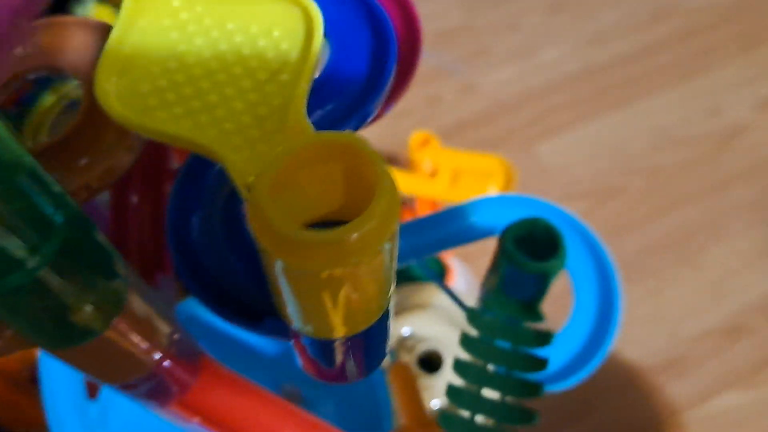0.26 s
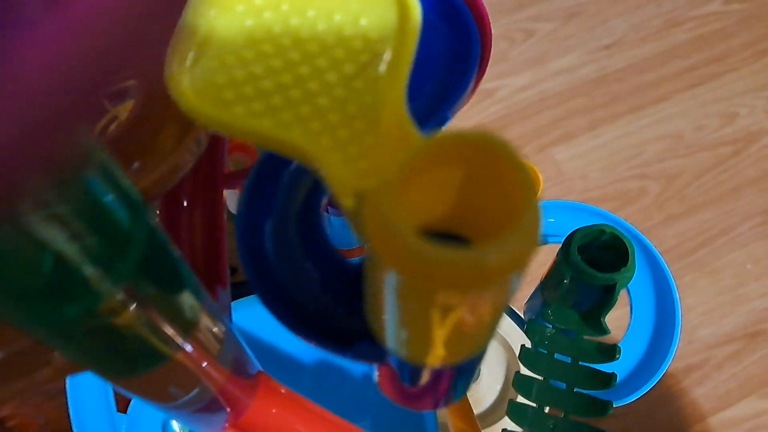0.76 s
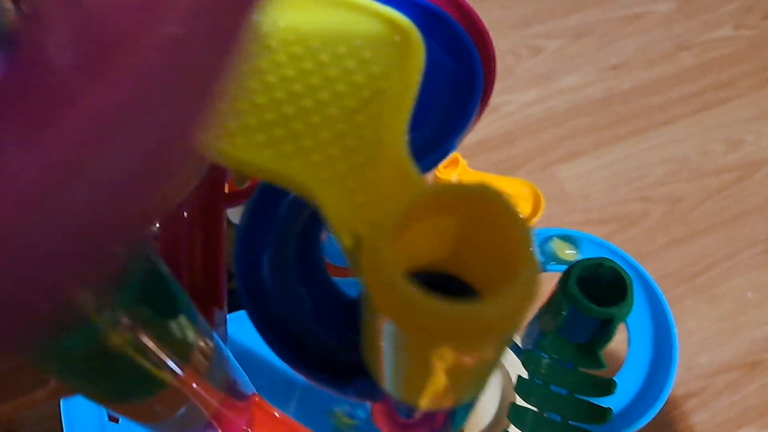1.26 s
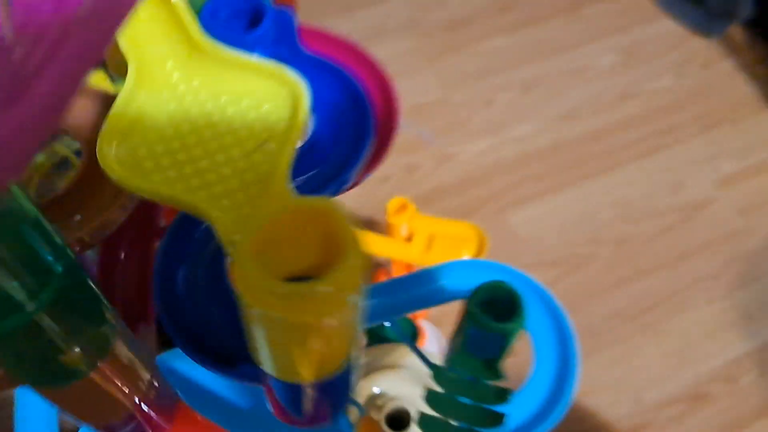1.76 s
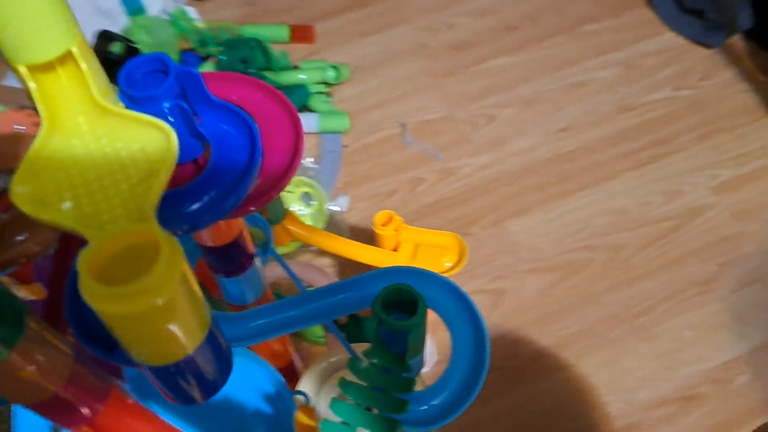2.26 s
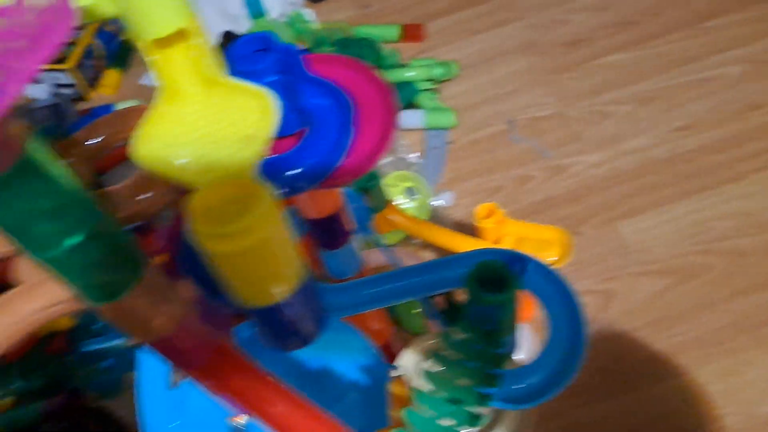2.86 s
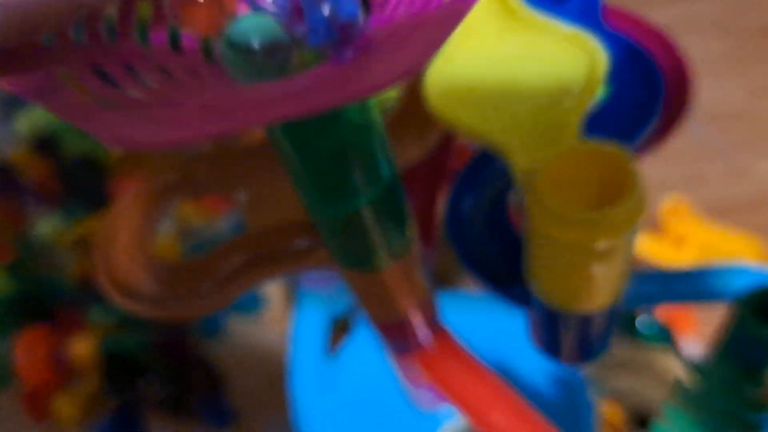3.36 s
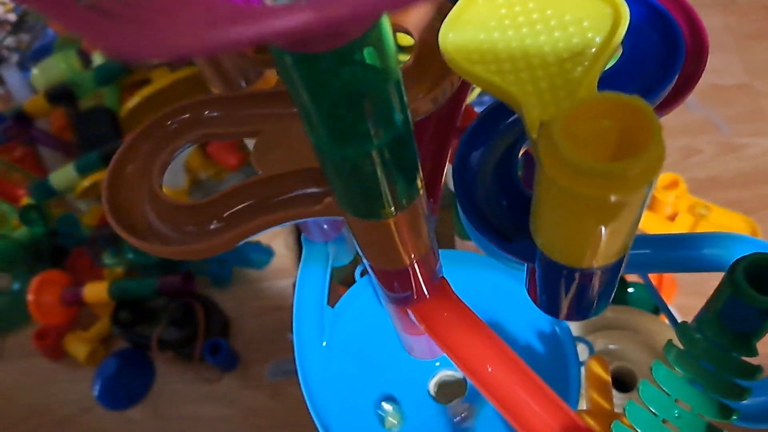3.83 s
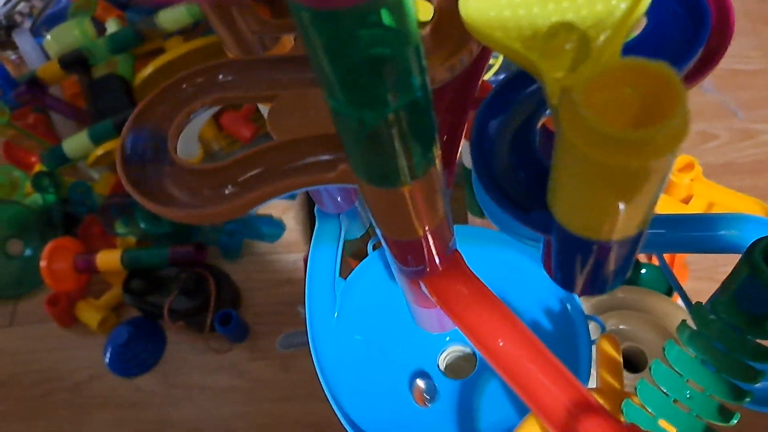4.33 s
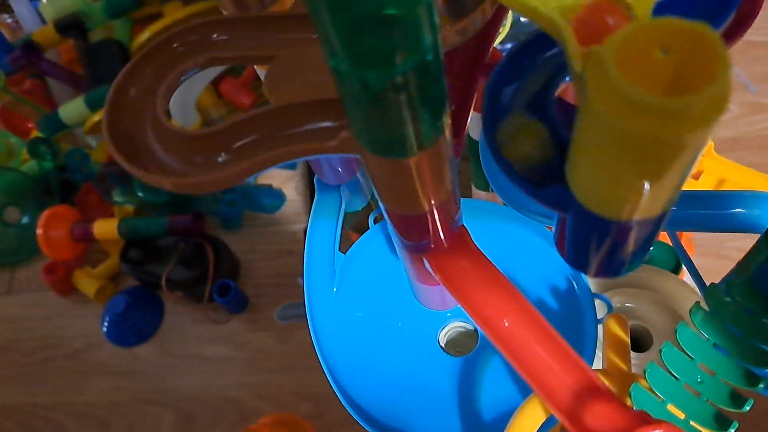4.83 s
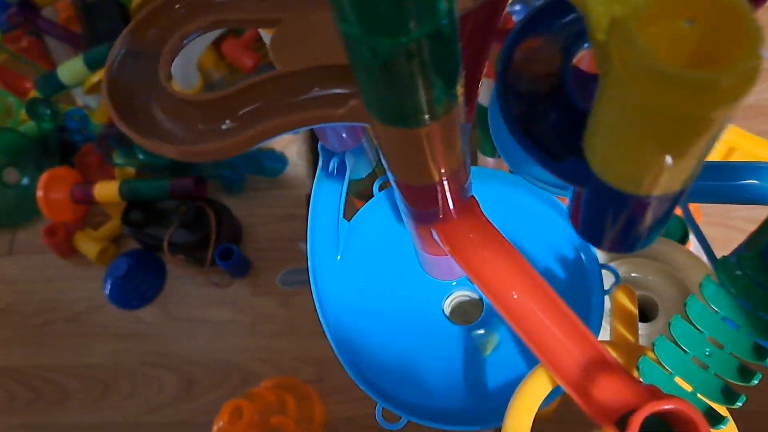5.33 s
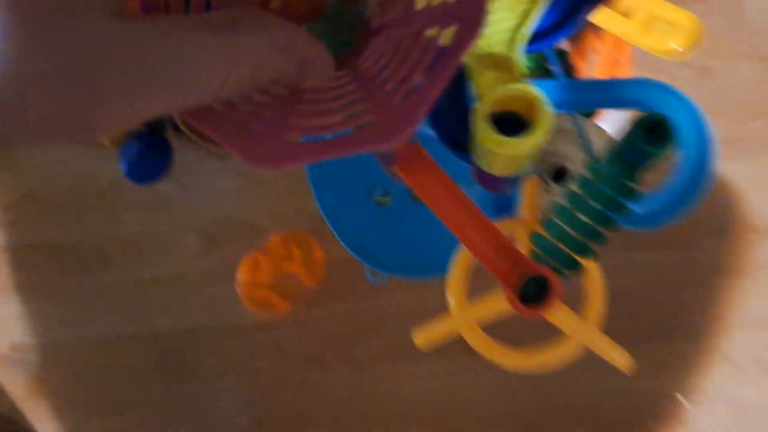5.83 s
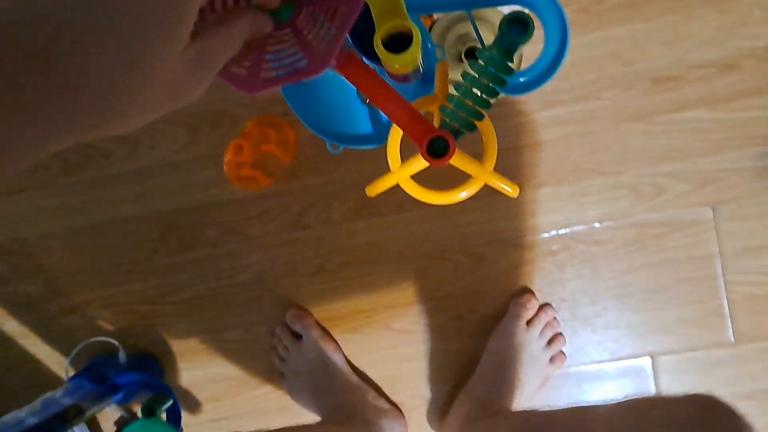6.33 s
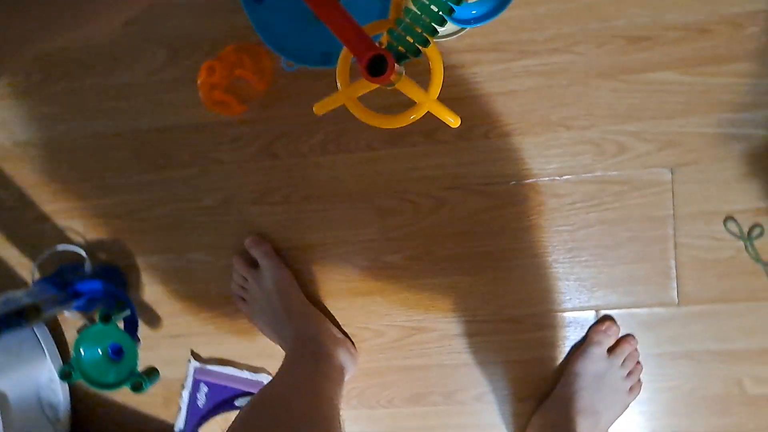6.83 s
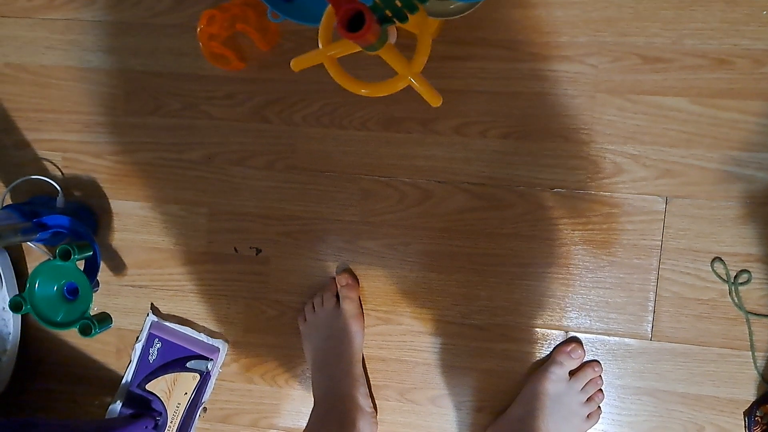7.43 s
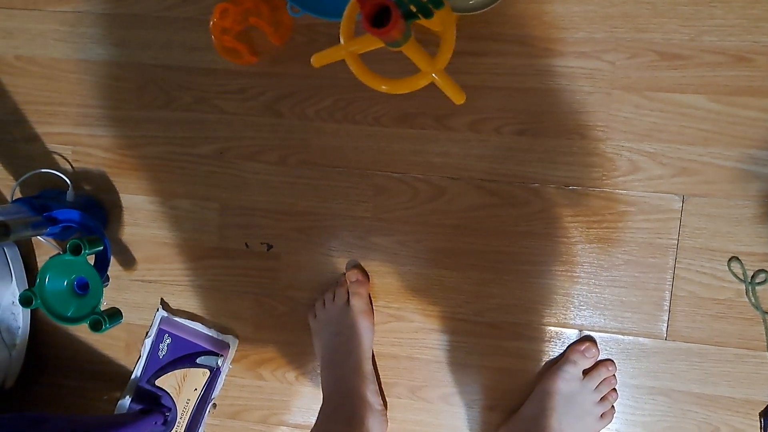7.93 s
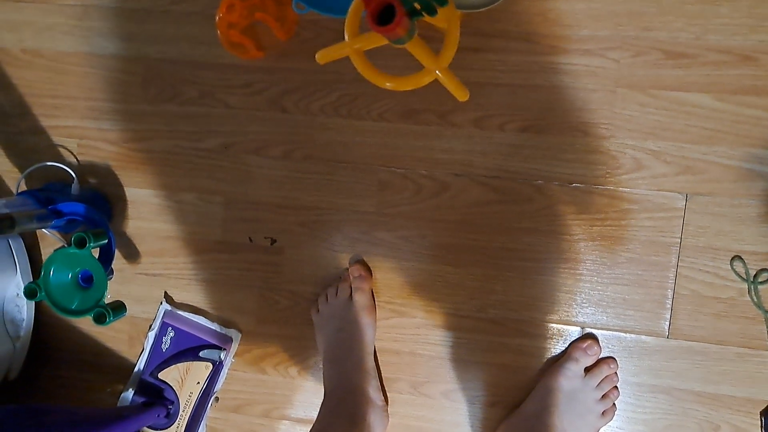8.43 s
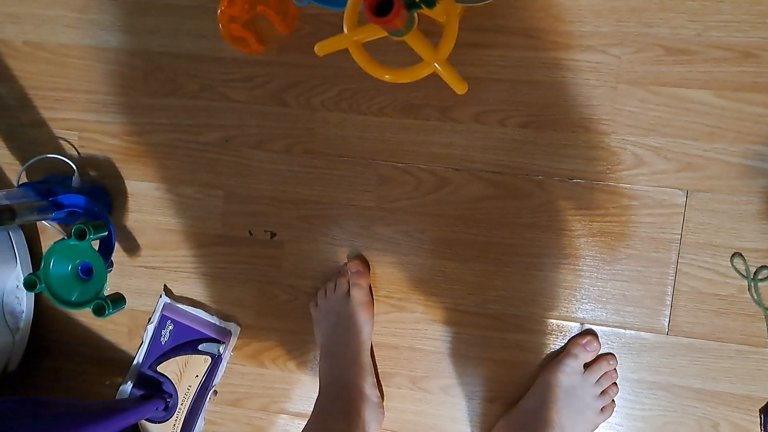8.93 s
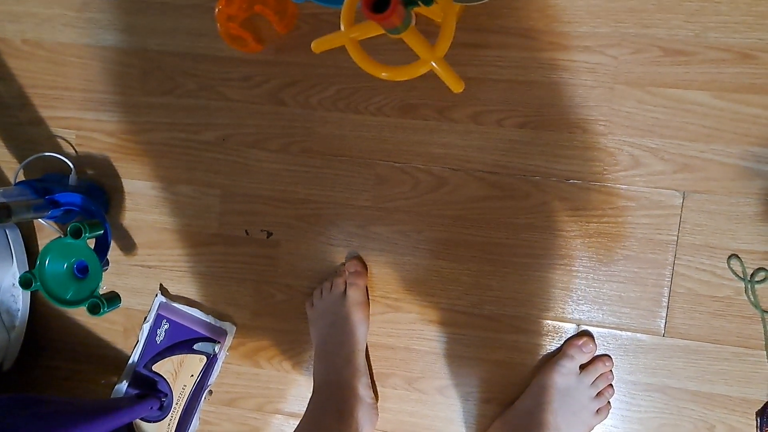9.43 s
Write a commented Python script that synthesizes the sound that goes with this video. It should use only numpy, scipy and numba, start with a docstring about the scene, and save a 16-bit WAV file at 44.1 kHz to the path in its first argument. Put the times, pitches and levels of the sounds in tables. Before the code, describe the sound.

A dense, irregular rattle of small glass marbles tumbling through hollow plastic tracks, with sharp clicks, glassy ticks and a few dull thuds, indoors.

```python
"""A small room: glass marbles tumble down a plastic marble run close to a hand-held two-port microphone.
Knocks, ribs, glass ticks and thuds ring dying modes of the track pieces, with a chatter after each knock.
Rolling is gusty noise through four tube resonances, and plunges are short sine rings of the long tube.
Farther marbles clatter, the walls answer with short noise tails and the holding hand now and then rumbles."""
import sys
import numpy as np
from scipy import signal
from scipy.fft import rfft, irfft, next_fast_len
from scipy.io import wavfile
from scipy.ndimage import map_coordinates
from numba import njit

SR = 44100
rng = np.random.default_rng(int(sys.argv[2]) if len(sys.argv) > 2 else 0)


def materialize(psi):
    """Save the field psi as 16-bit PCM at rate SR to the path in sys.argv[1].

    A 1-D psi becomes a single channel; in a 2-D psi each row is a channel.
    """
    bounded = np.clip(np.atleast_2d(psi).T, -1, 1)
    quanta = np.round(bounded * 32767).astype(np.int16)
    wavfile.write(sys.argv[1], SR, quanta)


def gain_from_db(level_db):
    """Turn a decibel level (scalar or array-like) into a linear amplitude factor."""
    decades = np.asarray(level_db, float) / 20
    return 10 ** decades


N = 426888  # samples
TOP_HZ = 16000  # ceiling of the modes and of the microphone


def unit(x):
    """Scales to rms 1."""
    return x / np.sqrt(np.mean(x ** 2) + 1e-20)


def along(points, hz):
    """Reads (f/Hz, value) points on a log frequency axis."""
    f, v = np.transpose(points)
    return np.interp(np.log(hz + 1), np.log(f + 1), v)


def curve(rows, axis=1):
    """Draws one level/dB column as a value per sample, silent outside its rows."""
    rows = np.asarray(rows)
    return np.interp(np.arange(N) / SR, rows[:, 0], rows[:, axis], -120, -120)


def wobble(rate):
    """Draws a smooth random curve with rate knots a second."""
    knots = rng.standard_normal(int(N * rate / SR) + 4)
    return map_coordinates(knots, [np.arange(N) * rate / SR])


def filtered(x, response):
    """Shapes x by a response of frequency."""
    m = next_fast_len(N + SR // 4)
    return irfft(rfft(x, m) * response(np.fft.rfftfreq(m, 1 / SR)), m)[..., :N]


# Likeness of the sound at the two ports: f/Hz, correlation [-1 to 1]
PORT_LIKENESS = [(60, 0.44), (240, 0.96), (950, 0.76), (3770, 0.13), (15000, -0.23)]


def rush(gain, alike=PORT_LIKENESS):
    """Stereo noise of rms 1: gain sets its spectrum, the mid/side balance sets how alike the ports are."""
    def mid_side(hz):
        turn = np.arccos(np.clip(along(alike, hz), -1, 1)) / 2
        return gain(hz) * [np.cos(turn), np.sin(turn)]
    mid, side = filtered(rng.standard_normal((2, N)), mid_side)
    return unit(np.array([mid + side, mid - side]))


def follow(hits, t60):
    """The strength of the blows at the left port, dying away over t60 seconds."""
    fading = gain_from_db(-60 * np.arange(SR // 4) / SR / t60)
    power = signal.oaconvolve(hits[0] ** 2, fading ** 2)[:N] / np.sum(fading ** 2)
    return np.sqrt(np.abs(power))


@njit
def add(out, start, step, rise, size):
    """Adds dying modes; step holds pitch and decay per sample, size the complex strength at each port."""
    for m in range(len(start)):
        z, gap = 1 + 0j, 1.
        end = min(out.shape[1], start[m] + int(-7 / np.log(abs(step[m]))))
        for i in range(start[m], end):
            out[0, i] += (1 - gap) * (size[0, m] * z).imag
            out[1, i] += (1 - gap) * (size[1, m] * z).imag
            z *= step[m]
            gap *= rise


# Modes of a track piece: f/Hz, level/dB
PLASTIC_MODES = [(150, -22), (250, -10), (350, -15.5), (460, 0.5), (630, 5.5), (780, -5.5), (1150, -7),
                 (1450, 1), (1780, 7.5), (2200, 6.5), (2500, 7.5), (2850, 5.5), (3150, 5), (3550, 9.5),
                 (4100, 10), (4650, 15.5), (5150, 16.5), (5700, 10.5), (6700, 12), (7800, 15), (9000, 12),
                 (10300, 16), (11700, 23), (13000, 18.5), (14500, 13), (15600, 11)]
# Tone control points, the centres of body, main ring, wall and tick: f/Hz
COLOUR_HZ = [700, 2900, 4900, 11000]


def ring(s, db, colour_db, detune, scatter_db, t60, attack=.0004, spot_hz=None):
    """Every blow lands on another piece: the modes come shifted, at new strengths, in threes.
    t60 [s] is typical at 3 kHz; attack [s] is the time constant of the onset."""
    hz, level = np.repeat(PLASTIC_MODES, 3, axis=0).T
    chance = rng.standard_normal((len(s), len(hz), 5))
    tint = np.array([along(list(zip(COLOUR_HZ, c)), hz) for c in colour_db])
    hz = np.minimum(hz * np.exp(detune * chance[..., 0]), TOP_HZ)
    if spot_hz is not None:  # modes near the pitch of the struck spot take most of the blow
        tint = tint + 9 * np.exp(-(np.log(hz / spot_hz[:, None]) / .11) ** 2)
    # plastic damps high modes faster
    t60 = t60 * (hz / 3000) ** -.9 * np.exp(.25 * chance[..., 1])
    step = np.exp((2j * np.pi * hz - np.log(1000) / t60) / SR)
    # neighbouring modes start in step, which makes the attack sharp
    sign = np.repeat(np.sign(chance[:, ::3, 3]), 3, axis=1)
    size = gain_from_db(level + tint + scatter_db * chance[..., 2]) * sign
    # the blow's energy is shared out among the modes
    size = size * (gain_from_db(db) / np.linalg.norm(size, axis=1))[:, None]
    # high modes radiate in lobes, so the two ports hear them with unrelated phase
    apart = np.sqrt(-2 * np.log(np.clip(along(PORT_LIKENESS, hz), .01, 1)))
    ports = np.array([size.ravel() + 0j, (size * np.exp(1j * apart * chance[..., 4])).ravel()])
    # modes too faint to matter are skipped
    heard = (np.abs(size) > gain_from_db(db - 33)[:, None]).ravel()
    start = np.repeat(np.round(s * SR).astype(np.int64), hz.shape[1])
    out = np.zeros((2, N))
    add(out, start[heard], step.ravel()[heard], np.exp(-1 / (attack * SR)), ports[:, heard])
    return out


# Marble on plastic: t/s, level/dB of the blow, f/Hz of the struck spot
KNOCKS = [(0.0124, -5, 3480), (0.0618, -4, 5250), (0.0897, -9, 5260), (0.3297, -19, 3100),
          (0.3956, -6, 3070), (0.4359, -8, 3510), (0.4816, -10, 3070), (0.4958, -12, 3070),
          (0.5235, -14, 3120), (0.7459, -5, 3800), (0.792, -5, 3480), (0.8233, -5, 3130),
          (0.8487, -10, 4410), (1.2552, -5, 3310), (1.2651, -7, 3310), (1.2722, -9, 4830),
          (1.298, -10, 2640), (1.3177, -6, 3110), (1.3643, -7, 3170), (1.3906, -8, 5090),
          (1.6417, -18, 3000), (1.7138, -7, 3070), (1.7314, -9, 3390), (1.7687, -9, 3490),
          (1.7965, -15, 3060), (1.814, -6, 3050), (2.0946, -16, 3850), (2.1487, -4, 3470),
          (2.1628, -6, 3480), (2.186, -9, 2940), (2.2299, -11, 2950), (2.2532, -11, 2960),
          (2.3403, -8, 4900), (2.434, -16, 3900), (2.446, -7, 3840), (2.4868, -9, 4110),
          (2.5311, -17, 3940), (2.5911, -6, 2990), (2.6988, -6, 4170), (2.7465, -11, 3230),
          (2.7695, -13, 3210), (2.829, -6, 3260), (2.8411, -8, 3240), (2.8889, -7, 3230),
          (2.9014, -6, 3960), (2.911, -7, 5100), (2.9228, -8, 4260), (2.9411, -6, 2540), (2.9676, -6, 3950),
          (3.0788, -14, 3260), (3.1468, -6, 4410), (3.164, -10, 2420), (3.1912, -7, 3320),
          (3.2292, -7, 3120), (3.2475, -13, 2480), (3.2583, -13, 2660), (3.2896, -8, 2630),
          (3.4027, -11, 3290), (3.4366, -5, 3560), (3.4659, -11, 2820), (3.686, -10, 3270),
          (3.7203, -9, 2490), (3.7343, -8, 3260), (3.7437, -6, 3280), (3.752, -8, 2890), (3.7882, -9, 3000),
          (3.8106, -6, 2930), (3.8288, -5, 2850), (3.838, -6, 2860), (3.8477, -8, 2900),
          (3.8722, -12, 2940), (3.9056, -6, 2950), (3.9217, -11, 2930), (3.9748, -7, 3840),
          (4.0389, -10, 3390), (4.0555, -11, 3430), (4.0741, -7, 2860), (4.1153, -8, 3010),
          (4.1472, -12, 5080), (4.1714, -13, 2870), (4.2322, -14, 3200), (4.3148, -9, 5170),
          (4.3487, -12, 2950), (4.3734, -6, 4750), (4.4203, -10, 3700), (4.5381, -9, 4120),
          (4.5545, -8, 3000), (4.591, -6, 2870), (4.6129, -10, 2820), (4.6805, -11, 3230),
          (4.7223, -7, 2690), (4.7652, -10, 3240), (4.7769, -6, 5160), (4.8069, -5, 5220),
          (4.8216, -10, 3250), (4.916, -6, 4810), (4.9525, -3, 3330), (4.9636, -9, 3320),
          (4.971, -10, 2900), (4.9928, -9, 2990), (5.022, -10, 2920), (5.0539, -6, 2950),
          (5.1088, -6, 4710), (5.1376, -12, 4660), (5.1668, -10, 3070), (5.223, -6, 4630),
          (5.2476, -9, 4690), (5.2875, -12, 5050), (5.3019, -9, 4630), (5.3228, -9, 3040),
          (5.3414, -8, 4210), (5.3526, -2, 4670), (5.364, -7, 4760), (5.4269, -12, 4680),
          (5.4458, -9, 2950), (5.4549, -5, 4660), (5.487, -12, 4470), (5.511, -8, 3120), (5.6288, -4, 4670),
          (5.6471, -11, 2510), (5.7012, -15, 2580), (5.85, -15, 3000), (5.8617, -10, 3820),
          (5.891, -13, 2790), (6.1452, -15, 4150), (6.1925, -14, 2700), (6.2093, -9, 3090),
          (6.2909, -6, 2940), (6.3313, -11, 4820), (6.3794, -6, 4620), (6.393, -10, 2760),
          (6.409, -11, 4680), (6.4511, -12, 2900), (6.5027, -7, 3050), (6.5991, -9, 3140),
          (6.6548, -18, 3050), (6.8159, -18, 3070), (6.8559, -8, 2850), (6.8657, -9, 2840),
          (6.8802, -13, 2850), (6.9667, -7, 3380), (7.0504, -12, 2860), (7.0743, -10, 2870),
          (7.1097, -5, 3040), (7.1798, -8, 2670), (7.3799, -11, 4340), (7.4132, -9, 2530),
          (7.4367, -10, 2500), (7.4687, -11, 2440), (7.5043, -11, 3570), (7.5662, -6, 5100),
          (7.6082, -9, 3480), (7.6206, -7, 3140), (7.7376, -16, 2490), (7.8679, -8, 3740),
          (7.912, -5, 3030), (7.9509, -10, 3050), (8.0038, -8, 3450), (8.0644, -12, 2330),
          (8.287, -14, 2140), (8.3492, -6, 4540), (8.3619, -9, 2490), (8.3922, -13, 2510),
          (8.4133, -7, 2670), (8.447, -8, 4650), (8.48, -5, 4620), (8.4984, -11, 4790), (8.5213, -5, 3550),
          (8.566, -9, 4680), (8.5744, -9, 2470), (8.5917, -7, 4650), (8.6055, -11, 2500),
          (8.6175, -13, 2490), (8.6713, -12, 2420), (8.7158, -11, 2620), (8.7388, -10, 3100),
          (8.764, -7, 2150), (8.7896, -8, 2200), (8.8268, -17, 3020), (8.9108, -11, 2390),
          (8.9591, -8, 2530), (8.9829, -11, 2510), (9.1171, -9, 5180), (9.1451, -9, 5190),
          (9.2385, -6, 2380), (9.2843, -13, 2500), (9.4472, -12, 2720), (9.4754, -5, 3000),
          (9.5183, -13, 4360), (9.6053, -16, 2750), (9.6599, -13, 2350)]


def knocks():
    """Each clear knock, then the marble chattering against the wall in a few mostly fainter contacts."""
    rebounds = 3
    first_db, fade_db_per_s = -7, 260  # chatter under the knock, then its fade with time
    s, db, spot_hz = np.transpose(KNOCKS)
    colour = [-15.5, 3, 0, -13] + rng.normal(0, 2.2, (len(s), len(COLOUR_HZ)))
    blow = ring(s, db, colour, detune=.059, scatter_db=2, t60=.035, attack=.0004, spot_hz=spot_hz)
    flights = rng.uniform(.002, .011, (len(s), rebounds))  # seconds between contacts
    late = np.cumsum(flights, axis=1)
    after_db = (db + first_db)[:, None] - fade_db_per_s * late + rng.normal(0, 2.5, late.shape)
    chatter = ring((s[:, None] + late).ravel(), after_db.ravel(), np.repeat(colour, rebounds, axis=0),
                   detune=.057, scatter_db=4.5, t60=.023, attack=.00025,
                   spot_hz=np.repeat(spot_hz, rebounds))
    return blow + chatter


# A marble runs over a ribbed piece: t/s of the first rib, t/s between ribs, level/dB, f/Hz of the spot
RIBS = [(.549, .0157, -18.5, 3500), (1.877, .0187, -19, 3200)]
# Taps in each run: [count]
RIB_COUNTS = (12, 9)


def ribs():
    """Nearly even runs of light taps: each rib strikes the modes around its run's pitch."""
    first, gap, db, spot_hz = np.repeat(RIBS, RIB_COUNTS, axis=0).T
    slip, size = rng.standard_normal((len(gap), 2)).T
    rib = np.concatenate([np.arange(count) for count in RIB_COUNTS])
    s = first + gap * (rib + .05 * slip)
    return ring(s, db + 1.5 * size, [[-20, 3, -3, -8]] * len(gap),
                detune=.03, scatter_db=2.5, t60=.03, attack=.0006, spot_hz=spot_hz)


# Marble on marble: t/s, level/dB
TICKS = [(0.3955, -16), (1.2979, -17), (1.3174, -15), (1.7794, -14), (2.1625, -13), (2.3426, -7),
         (2.6988, -15), (2.7651, -7), (2.8888, -16), (2.9228, -14), (2.9432, -10), (3.041, -11),
         (3.4366, -15), (3.4491, -12), (3.4654, -14), (3.4895, -9), (3.5002, -13), (3.6905, -9),
         (3.7014, -7), (3.7144, -12), (3.7274, -11), (3.7653, -11), (3.7808, -11), (3.8077, -6),
         (3.8189, -16), (3.8324, -11), (3.8478, -11), (3.8716, -11), (4.2308, -14), (4.7606, -16),
         (4.9606, -9), (4.9714, -12), (5.0439, -16), (5.8087, -9), (7.0818, -17), (7.1526, -15),
         (6.393, -16), (7.064, -18), (7.4764, -12), (7.5343, -11), (7.6191, -13), (8.5739, -14),
         (8.902, -15)]


def ticks():
    """Glass meets glass in so short a contact that the highest modes under it lead."""
    s, db = np.transpose(TICKS)
    return ring(s, db, [[-45, -17, -11, 0]] * len(s), detune=.09, scatter_db=2.5, t60=.031, attack=.00015)


# Heavier drops into a hollow piece: t/s, level/dB
THUDS = [(.542, -19), (.68, -21), (.869, -22), (1.061, -2), (1.081, -11), (1.086, -4), (1.132, -12),
         (1.157, -18), (1.178, -13), (1.217, -15), (1.259, -15), (1.506, -15), (2.341, -20), (2.487, -19),
         (2.919, -19), (3.181, -21), (4.375, -21)]


def thuds():
    """A heavier drop shakes the whole piece: low modes lead and hang on, the walls stay dull."""
    s, db = np.transpose(THUDS)
    boom_hz = np.full(len(s), 165)  # modes near this pitch are favoured
    blow = ring(s, db, [[-1, 0, -12, -26]] * len(s),
                detune=.1, scatter_db=2.5, t60=.011, spot_hz=boom_hz)
    boom = ring(s, db - 14, [[0, -8, -30, -40]] * len(s),
                detune=.15, scatter_db=3, t60=.025, attack=.003, spot_hz=boom_hz)
    return blow + boom


# Air resonances of the tubes, the long one first; the last two lists are the short tube at two pitches: f/Hz,
# width/Hz, level/dB
TUBES = [
    [(473, 55, 0)],
    [(788, 150, 0)],
    [(1800, 90, 0)],
    [(1700, 100, 0)],
]
# A marble drops into the long tube: t/s, peak level/dB
PLUNGES = [(5.853, -39), (5.891, -33), (5.975, -38), (9.475, -30)]


def plunges():
    """The air in the long tube rings briefly: a decaying sine from each drop."""
    t60 = .11  # seconds
    tube_hz = TUBES[0][0][0]
    out = np.zeros(N)
    for s, db in PLUNGES:
        since = (np.arange(N) / SR - s).clip(0)
        out += gain_from_db(db - 60 * since / t60) * np.sin(2 * np.pi * tube_hz * since)
    return out


# The crowded top modes, spectrum shape: f/Hz, level/dB
SIZZLE = [(5000, -24), (6500, -2), (9000, -6), (11700, 0), (16000, -11)]


def sizzle(hits):
    """The top modes lie too close to tell apart: each contact sets off a short bright noise burst."""
    under_db, t60 = -17.5, .032  # level against the contacts, decay in seconds
    return gain_from_db(under_db) * follow(hits, t60) * rush(lambda hz: gain_from_db(along(SIZZLE, hz)))


# Spectrum shape of the rolling rush: f/Hz, level/dB
ROLL = [(59, -58), (100, -19), (300, -11), (634, -11), (1000, -4), (1280, -1.5), (1800, -3), (2990, 6),
        (5200, -8), (6300, -20), (8640, -27.5), (11900, -24.5), (16000, -36)]
# Hum of the tubes before their gusts: t/s, then level/dB of each list in the order of TUBES
HUM = [(0.0, -58, -46, -47, -45), (0.78, -59, -46, -46, -46), (4.47, -60, -53, -48, -45),
       (5.36, -60, -50, -46, -42), (6.04, -56, -51, -44, -46), (6.55, -59, -51, -39, -45),
       (7.68, -60, -48, -38, -46), (9.68, -56, -49, -40, -47)]
# Activity of marbles further down the run: t/s, level/dB
TRAFFIC = [(0.0, -34), (0.91, -35), (2.2, -33), (3.1, -29), (3.69, -32), (3.88, -28), (4.34, -30),
           (5.2, -27), (5.74, -33), (6.2, -33), (6.36, -29), (8.0, -26), (8.3, -30), (8.55, -26),
           (9.33, -30), (9.68, -25.5)]


def rolling(hits):
    """Glass on plastic rushes unevenly, hardest just after blows, and sets the air in three tubes humming; the
    short tube's hum moves between pitches near 1800 and 1700 Hz."""
    rush_db = -5.5  # over the traffic level
    skid = follow(hits, t60=.27)

    def peaks(modes):
        return lambda hz: sum(gain_from_db(db) / (1 + (2 * (hz - c) / width) ** 2) for c, width, db in modes)

    hums = 0
    for k, tube in enumerate(TUBES):
        gusts = gain_from_db(2.5 * wobble(25) + 1.7 * wobble(5)) * (1 + 11 * skid)
        hums = hums + gain_from_db(curve(HUM, axis=k + 1)) * gusts * rush(peaks(tube))
    strength = gain_from_db(curve(TRAFFIC) + rush_db) + .18 * skid
    unevenness = gain_from_db(2.85 * wobble(40) + 1.1 * wobble(9.6))
    return hums + strength * unevenness * rush(lambda hz: gain_from_db(along(ROLL, hz)))


def clatter():
    """Many small contacts of marbles further down the run, short rings that follow the traffic level."""
    count = 1400
    over_db, spread_db = -1.5, 4.2  # least level over the traffic, scale of the random rise above it
    s, size, *tint = rng.random((count, 5)).T
    s = s * N / SR
    db = curve(TRAFFIC)[(s * SR).astype(int)] + over_db - spread_db * np.log(np.maximum(size, .05))
    tint = np.transpose([tint[0], .5 + 0 * s, tint[1], tint[2]])  # the main ring is left as it is
    colour = np.array([-23, -2.5, -1.5, -15]) + 8 * (tint - .5)
    return ring(s, db, colour, detune=.07, scatter_db=4, t60=.018, attack=.0002)


# Fingers shift, before wobble and port balance: t/s of the peak, level/dB, t/s of a 20 dB fall
HANDLING = [(3.71, -50, .06), (5.74, -60, .08), (5.93, -45, .12), (6.11, -55, .06), (7.59, -49, .06),
            (8.5, -46, .5)]
# Spectrum shape of the rumble: f/Hz, level/dB
RUMBLE = [(20, -16.5), (55, 10), (110, -6), (200, -19)]


def handling():
    """Fingers shift on the case: low lumps of noise, strongest at the right port, over a faint rumble."""
    still_db, rise_s = -81, .06  # resting hand; time of a 20 dB rise
    t = np.arange(N) / SR
    level = gain_from_db(still_db)
    for s, db, fall_s in HANDLING:
        level = level + gain_from_db(db - 20 * np.maximum((s - t) / rise_s, (t - s) / fall_s))
    port_balance = gain_from_db([[-6], [5]])  # left, right
    noise = rush(lambda hz: gain_from_db(along(RUMBLE, hz)) * (hz < 260), [(50, .3)])
    return level * gain_from_db(.83 * wobble(18)) * port_balance * noise


# Decay of the walls' answer: f/Hz, t60/s
ROOM = [(200, 0.15), (2000, 0.2), (12000, 0.12)]


def room(x):
    """Noise tails: each frequency of the walls' answer dies at its own speed, with its own port likeness.
    Marbles and microphone keep moving, so the answer changes from moment to moment."""
    places = 4
    hz, t, z = signal.stft(rng.standard_normal((places, 2, SR // 3)), SR, nperseg=256)
    alike = np.clip(along(PORT_LIKENESS, hz), 0, 1)[:, None]
    z = np.stack([z[:, 0], alike * z[:, 0] + np.sqrt(1 - alike ** 2) * z[:, 1]], axis=1)
    tails = signal.istft(z * gain_from_db(-60 * t / along(ROOM, hz)[:, None]), SR, nperseg=256)[1]
    tails = tails / np.linalg.norm(tails[0, 0])
    tails = np.pad(tails, ((0, 0), (0, 0), (180, 0)))  # 4 ms before the walls answer
    # another random place every 900 samples, about 20 ms
    place = np.repeat(rng.integers(places, size=N // 900 + 1), 900)[:N]
    return sum(signal.oaconvolve(x * (place == k), tail, axes=1)[:, :N] for k, tail in enumerate(tails))


def scene():
    """Mixes the run, its room and the hand."""
    near = knocks() + ribs() + ticks() + thuds()
    hits = near + clatter() + plunges()
    hits = hits + sizzle(hits)
    # the microphone moves away at 5.75 s and hears more of the walls
    wet = gain_from_db(np.where(np.arange(N) / SR < 5.75, -8, -5.5))
    return hits + room(wet * hits) + rolling(near) + handling()


# Left port over right: f/Hz, level/dB
PORT_LEAN = [(60, -1.5), (130, 0.5), (290, -2), (640, 0.5), (1410, 2.5), (3100, 15.5), (6820, 5.5),
             (15000, 0)]


def low_pass(x):
    """Removes everything above the highest recorded frequency."""
    return signal.sosfilt(signal.butter(12, 16830, fs=SR, output="sos"), x)


def record(dry):
    """The left port resonates around 3 kHz and takes most of the treble there; loud peaks clip softly."""
    def share(hz):
        lean = np.outer([-1, 1], along(PORT_LEAN, hz))
        return 2 / (1 + gain_from_db(lean)) * (hz < TOP_HZ)
    x = filtered(dry, share)
    mix = x / (1 + np.abs(x) ** 8) ** (1 / 8)
    return low_pass(mix)


dry = scene()
out = record(dry)
materialize(out)
```